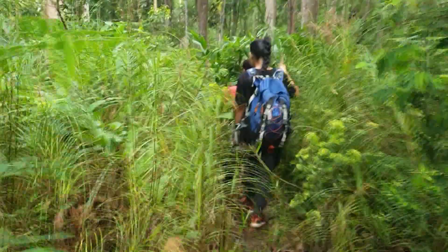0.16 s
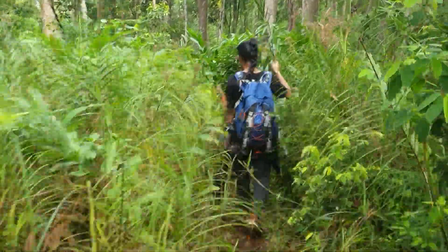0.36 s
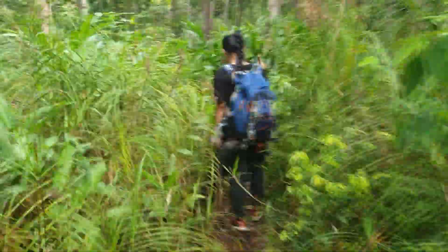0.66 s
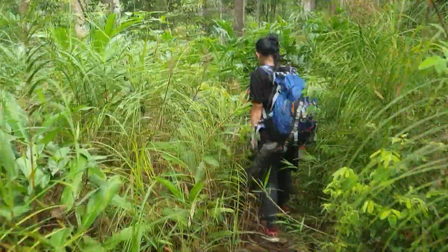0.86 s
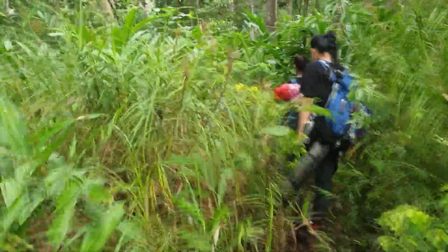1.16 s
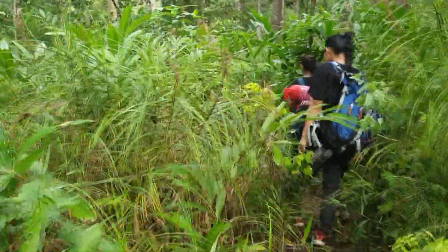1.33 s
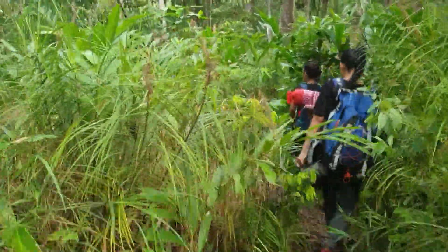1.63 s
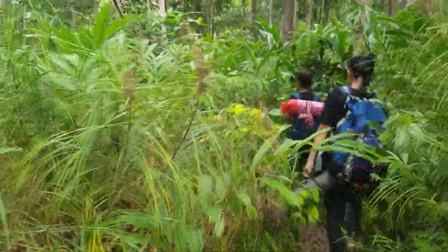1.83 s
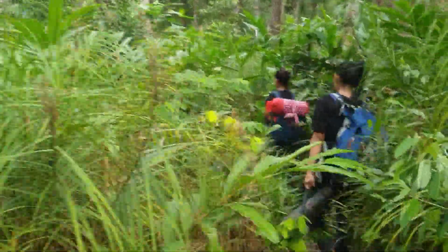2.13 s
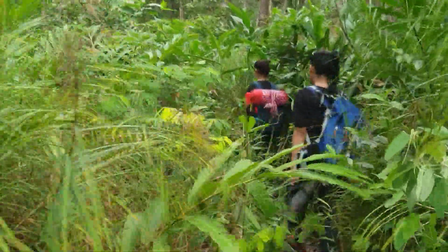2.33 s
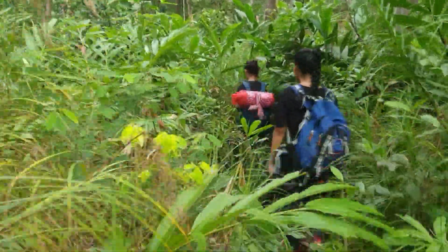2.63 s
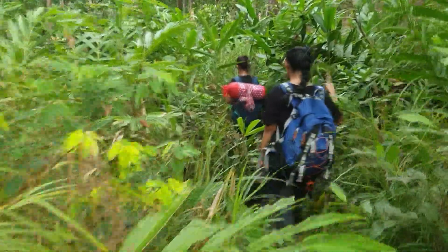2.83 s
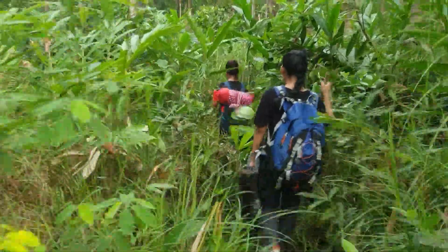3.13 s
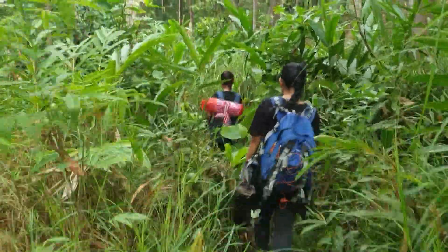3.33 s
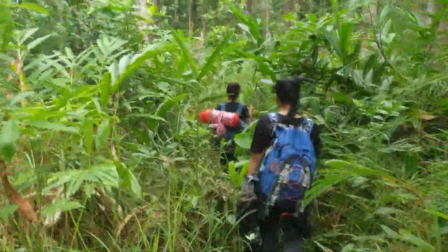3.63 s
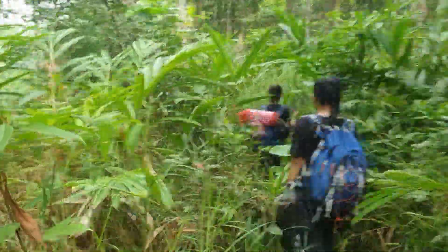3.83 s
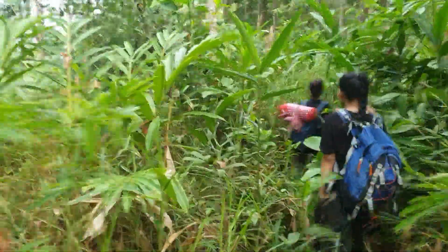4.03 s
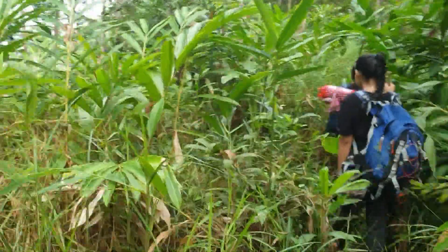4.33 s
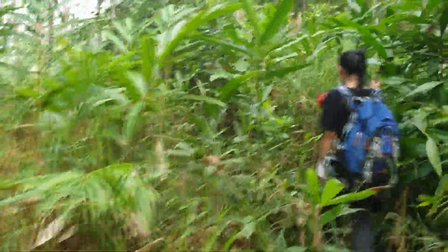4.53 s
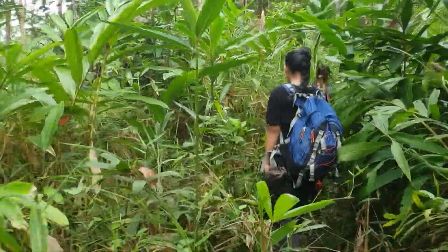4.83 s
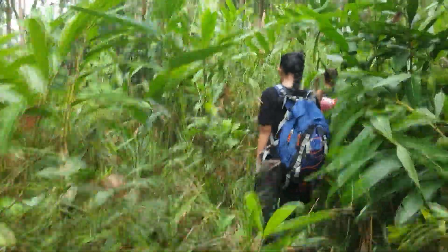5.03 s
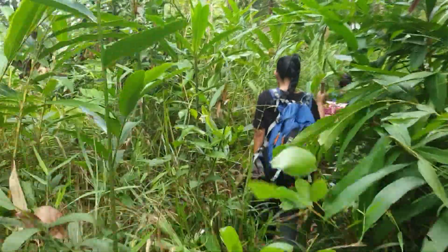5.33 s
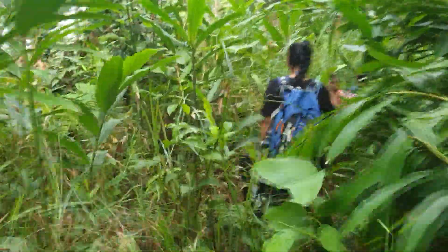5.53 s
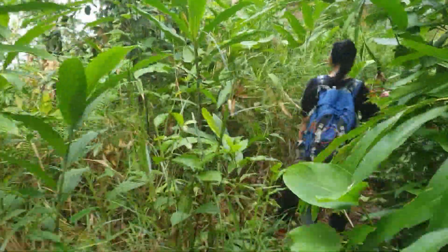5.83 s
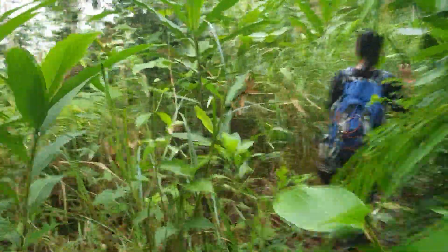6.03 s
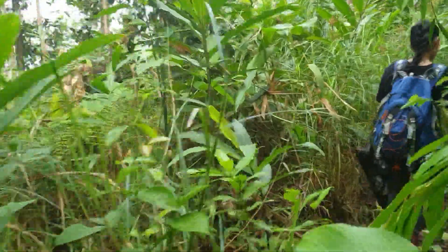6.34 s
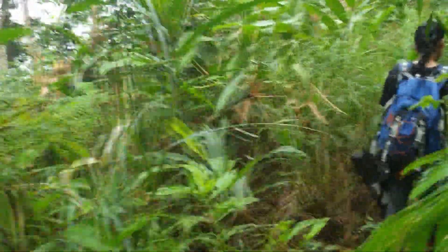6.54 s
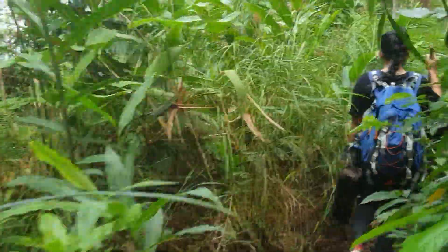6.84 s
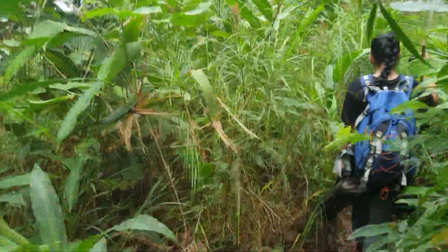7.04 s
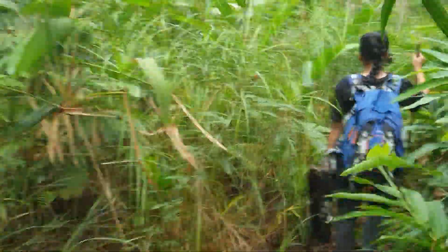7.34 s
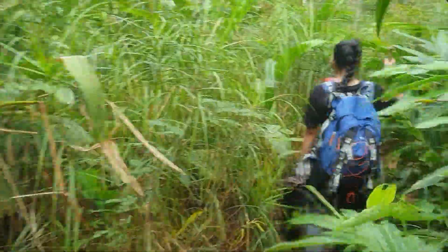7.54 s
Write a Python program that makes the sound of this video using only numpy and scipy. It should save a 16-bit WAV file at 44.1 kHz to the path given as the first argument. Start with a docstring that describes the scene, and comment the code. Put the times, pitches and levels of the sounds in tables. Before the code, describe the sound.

Walkers push through dense undergrowth with rustling leaves, sharp twig cracks and soft footfalls over a high, constant cicada chorus.

```python
"""Legs swish through tall grass and stems snap on an overgrown forest trail, over a cicada chorus.
One small microphone is carried behind the walkers. Leaves, litter and grass are grainy noise under stride and
sweep envelopes; snaps, soft footfalls and grass flicks are dying bursts of resonant noise. The cicadas are
ringing clicks in one shrill band near 5 kHz over a wide hiss; their level drops abruptly after the last
loud snaps, as if a recorder's gain control turned them down."""
import sys
import numpy as np
from scipy import signal
from scipy.io import wavfile
from scipy.ndimage import uniform_filter1d

SR = 44100
rng = np.random.default_rng(int(sys.argv[2]) if len(sys.argv) > 2 else 0)


def wav_record(signal):
    """Record a signal, one row per channel, as 16-bit PCM in the file named by sys.argv[1]."""
    frames = np.transpose(np.atleast_2d(signal))
    bounded = np.clip(frames, -1, 1)
    # unit amplitude maps onto the largest positive 16-bit level
    quanta = np.round(bounded * 32767).astype(np.int16)
    wavfile.write(sys.argv[1], SR, quanta)


N = 338688  # samples

# Fine grass swishing round the legs. Each row: frequency in Hz, relative density in dB per Hz.
SWISH_SPECTRUM = [(7000, -45), (8800, -15.5), (10000, -1.5), (12000, 0.5), (13200, -4), (14200, -10),
                  (16000, -20)]
# Airy grass tops close to the microphone. Each row: frequency in Hz, relative density in dB per Hz.
AIR_SPECTRUM = [(12000, -25), (13300, -4), (14200, 0), (16000, -2)]
REST_SWISH_DB, REST_AIR_DB = -47.3, -54.1  # grass between sweeps


def fine_grass():
    """Thin blades scrape past the legs, and grass tops brush by close to the microphone."""
    blades = friction(SWISH_SPECTRUM, per_s=1500, spread_db=3.3, grainy=0.078, patchy_db=1.2, damping=0.15)
    tops = friction(AIR_SPECTRUM, per_s=1500, spread_db=3.0, grainy=0.1, patchy_db=1.5, damping=0.15)
    return sweep_gain(0, REST_SWISH_DB) * blades + sweep_gain(1, REST_AIR_DB) * tops


# Legs sweeping through the grass. Each row: start in seconds, length in seconds, swish level in dB,
# level in dB of the airy grass tops close to the microphone.
SWEEPS = [(-.05, .22, -40, -46.5), (.08, .26, -38.5, -46.5), (.23, .49, -42, -54), (.63, .61, -40.5, -48),
          (1.2, .65, -45.5, -63), (1.67, .76, -44, -51.5), (2.25, .99, -46, -59), (3.08, .65, -41, -48.5),
          (3.56, .72, -43, -52), (4.3, .44, -41, -58.5), (4.88, .47, -44.5, -53.5), (5.35, .08, -39, -50.5),
          (5.35, .49, -48, -63), (6.03, .42, -39, -45), (6.36, .15, -42.5, -48.5), (6.39, .59, -46, -52),
          (6.83, .4, -43, -47), (7.0, .46, -42, -46.5), (7.58, .18, -47, -52)]
SWEEP_EDGE_S = 0.16  # longest fade in or out


def sweep_gain(layer, rest_db):
    """Gain of one grass layer: each sweep fades in, holds and fades out over the resting level."""
    t = np.arange(N) / SR
    power = gain_of(rest_db) ** 2
    for start, length, *levels_db in SWEEPS:
        edge = min(SWEEP_EDGE_S, length / 2)
        distance_to_end = np.minimum(t - start, start + length - t)
        fade = np.clip(distance_to_end / edge, 0, 1)
        power = power + (gain_of(levels_db[layer]) * fade) ** 2
    return np.sqrt(power)


# Broad leaves brushed aside. Each row: frequency in Hz, relative density in dB per Hz.
RUSTLE_SPECTRUM = [(700, -13.5), (1100, -20.5), (1500, -7), (2200, -3.5), (2800, -0.5), (3500, -7.5),
                   (5500, -5), (9000, -18), (14000, -36)]


def broad_leaves():
    """Leaves scrape in many small slips, louder with the strides."""
    rustle = friction(RUSTLE_SPECTRUM, per_s=900, spread_db=2.55, grainy=0.17, patchy_db=1.95, damping=0.18)
    return stride_gain(1) * rustle


# Litter underfoot. Each row: frequency in Hz, relative density in dB per Hz.
TREAD_SPECTRUM = [(60, -7), (110, -0.5), (160, -2), (300, -1.5), (600, -2), (1100, -2), (1400, -3),
                  (2200, -46.5)]


def litter(tread_gain):
    """Trodden litter grinds in low, dull scrapes."""
    return tread_gain * friction(TREAD_SPECTRUM, per_s=400, spread_db=2.2, grainy=0.1, patchy_db=1.94,
                                 damping=0.22, size=1024)


# Steady wading between strides. Each row: time in seconds, litter underfoot in dB, broad leaves in dB.
WADING = [(0.0, -60.0, -43.0), (0.43, -61.0, -50.5), (0.57, -55.5, -44.5), (0.83, -61.5, -46.0),
          (1.13, -58.5, -45.0), (1.31, -64.0, -49.5), (1.65, -66.5, -46.5), (1.79, -57.5, -44.0),
          (2.89, -60.0, -45.5), (3.2, -63.5, -43.5), (3.32, -58.5, -44.5), (3.96, -59.5, -47.5),
          (4.38, -58.5, -44.5), (4.93, -58.5, -46.5), (5.64, -61.0, -45.0), (5.94, -66.0, -47.0),
          (6.13, -59.0, -43.0), (6.82, -52.0, -41.0), (7.05, -44.5, -34.5), (7.29, -51.0, -37.5),
          (7.68, -54.0, -47.0)]
# Strides that scuff the litter and brush leaves aside. Each row: loudest moment in seconds,
# length in seconds, litter level in dB, leaf level in dB.
STRIDES = [(.2, .35, -53, -37.5), (.5, .31, -55.5, -39), (.93, .18, -55, -40), (1.37, .12, -50, -45.5),
           (1.53, .29, -57, -53.5), (2.33, .22, -54, -49.5), (2.62, .14, -53.5, -52.5),
           (3.02, .29, -59, -52.5), (3.25, .14, -51, -42), (3.74, .31, -66, -43), (4.17, .45, -52.5, -43.5),
           (4.68, .4, -54.5, -46.5), (5.17, .52, -51, -46.5), (5.39, .18, -50.5, -38),
           (5.51, .14, -54, -40.5), (6.43, .18, -58, -41), (7.22, .19, -37, -33), (7.65, .08, -45, -39.5)]
RISE = 0.49  # share of a stride spent swelling


def stride_gain(layer):
    """Gain of litter (0) or leaves (1): steady wading plus a swell and fall for every stride."""
    t = np.arange(N) / SR
    power = level(WADING, 1 + layer) ** 2
    for peak, length, *levels_db in STRIDES:
        start, end = peak - RISE * length, peak + (1 - RISE) * length
        arch = np.interp(t, [start, peak, end], [0, 1, 0])
        power = power + (gain_of(levels_db[layer]) * arch ** 2) ** 2
    return np.sqrt(power)


# Stems snapping and leaves flicking back. Each row: start in seconds, peak of the ring in dB,
# ring frequency in Hz, resonance width in Hz.
SNAPS = [(.041, -22, 2600, 1800), (.143, -25, 4200, 2500), (.146, -22, 2200, 1800),
         (1.081, -26, 2600, 2200), (1.188, -25, 2410, 2000), (1.433, -28, 1340, 700),
         (2.197, -26, 2210, 1600), (2.239, -31, 2160, 900), (2.537, -33, 1500, 900),
         (3.32, -27, 2700, 1500), (3.5, -28, 2300, 2000), (3.712, -24, 2250, 600), (5.089, -30, 2810, 800),
         (5.192, -20.5, 2570, 600), (5.221, -18, 2500, 1500), (5.228, -23, 2500, 1200),
         (5.361, -28, 2400, 1300), (6.405, -29, 1900, 1200), (6.555, -25, 1900, 1600),
         (6.584, -23, 2000, 1100), (6.675, -12.5, 2080, 2000), (6.79, -26, 2230, 1100),
         (7.101, -28, 2500, 900), (7.13, -25, 1600, 900), (7.188, -18, 4800, 3000), (7.194, -18, 900, 1190),
         (7.198, -16, 2600, 1200), (7.202, -12, 2500, 4000), (7.641, -26, 2300, 1500)]
SNAP_T60_S, T60_S_PER_DB, FAINT_DB = 0.022, 0.0014, -30  # above FAINT_DB a snap crackles on for longer
BREAK = 10  # first crack against its splinters, amplitude ratio before filtering
SPLINTER_DB = -12  # bright splinters against the ring


def snaps():
    """A break and its splinters ring the stem, with a short bright crackle on top."""
    out, t = np.zeros(N), burst_time()
    for start, db, hz, width in SNAPS:
        t60 = SNAP_T60_S + T60_S_PER_DB * max(db - FAINT_DB, 0)
        crack = rng.standard_normal(len(t)) + BREAK * (t == 0)  # the break itself, then splinters
        ring = burst(t, t60, hz, width, resonate(crack, hz, 2 * width))
        splinters = burst(t, 0.018, 3900, 3500, crack)
        add(out, start, gain_of(db) * ring)
        add(out, start, gain_of(db + SPLINTER_DB) * splinters)
    return out


# Feet on soft earth and roots. Each row: start in seconds, peak in dB, thud frequency in Hz,
# time in seconds for the driving noise to die by 60 dB.
STEPS = [(0.143, -48, 188, 0.11), (0.213, -50, 72.7, 0.08), (0.912, -40.5, 525, 0.08),
         (1.341, -44.5, 675, 0.12), (1.504, -41.5, 732, 0.039), (2.133, -44, 806, 0.1),
         (2.32, -43, 355, 0.2), (2.716, -54, 80.7, 0.091), (4.314, -39, 886, 0.05), (5.372, -43, 170, 0.08),
         (5.512, -44, 770, 0.08), (5.813, -45.5, 179, 0.048), (5.914, -46, 1100, 0.052),
         (5.981, -42.5, 1040, 0.07), (6.044, -44, 458, 0.052), (6.424, -43.5, 153, 0.051),
         (6.672, -37, 1030, 0.037), (7.019, -35.5, 470, 0.055), (7.184, -28, 167, 0.07),
         (7.464, -42, 161, 0.038)]


def footfalls():
    """A foot presses in over a few milliseconds and drives a broad, quickly dying thud."""
    out, t = np.zeros(N), burst_time()
    for start, db, hz, t60 in STEPS:
        push = resonate(rng.standard_normal(len(t)), hz, 4 * hz) * (1 - np.exp(-t / 0.006))
        add(out, start, gain_of(db) * burst(t, t60, hz, 0.8 * hz, push))
    return out


# Grass tips flicking against cloth. Each row: start in seconds, peak in dB.
TICKS = [(.146, -31), (.218, -29), (.782, -31), (1.084, -32), (5.374, -28), (5.762, -31), (6.31, -31),
         (6.467, -28), (6.657, -29), (7.006, -30), (7.353, -27)]


def grass_flicks():
    """Each tip gives a soft-edged burst of noise high in the treble."""
    out, t = np.zeros(N), burst_time()
    for start, db in TICKS:
        flick = rng.standard_normal(len(t)) * (1 - np.exp(-t / 0.0042))
        add(out, start, gain_of(db) * burst(t, 0.08, 12700, 6300, resonate(flick, 11400, 9700)))
    return out


# Rumble of the carried microphone. Each row: frequency in Hz, relative density in dB per Hz.
RUMBLE_SPECTRUM = [(22, -22), (45, -6), (62, 8.5), (95, -6), (150, -21)]
JOLT_DB, JOLT_S, SWAY_DB = -12, 0.15, -73  # jolt against the tread, its smoothing time, steady sway


def microphone_shake(tread_gain):
    """The carried microphone jolts sluggishly with the tread over a steady sway, heard as low rumble."""
    jolt = gain_of(JOLT_DB) * uniform_filter1d(tread_gain, round(JOLT_S * SR))
    rumble = coloured(rng.standard_normal(N), RUMBLE_SPECTRUM, 0.84, size=4096)
    return np.hypot(jolt, gain_of(SWAY_DB)) * rumble


# The insects as picked up, with the abrupt drop after the last loud snaps.
# Each row: time in seconds, near shrill singers in dB, distant wide chorus in dB.
INSECTS = [(0.0, -40.5, -38.5), (0.34, -37, -39.5), (0.77, -39.5, -39), (1.18, -38, -39),
           (1.69, -38, -39.5), (2.03, -38, -38), (2.35, -39.5, -38.5), (3.38, -40.5, -38.5),
           (3.78, -37.5, -37.5), (4.49, -37.5, -37.5), (4.85, -40, -38.5), (5.62, -38.5, -39),
           (5.82, -38, -40), (7.23, -39.5, -40.5), (7.38, -44, -44.5), (7.68, -42.5, -44)]
# Distant chorus. Each row: frequency in Hz, relative density in dB per Hz.
CHORUS_SPECTRUM = [(2400, -25), (3300, -5.5), (4200, -1), (5500, 0.5), (6400, -0.5), (7100, -8),
                   (8600, -15.5), (11000, -14.5), (13500, -45)]
# Near singers' tymbal resonances. Each row: frequency in Hz, width in Hz, level in dB among the singers.
SINGERS = [(4858, 98, 5), (4914, 104, 9), (5011, 108, 9.5)]


def cicadas():
    """Near singers share one shrill band; far singers blur to a wide hiss."""
    near = evened(sum(singer(*row) for row in SINGERS))
    far = coloured(rng.standard_normal(N), CHORUS_SPECTRUM, 1.16)
    return level(INSECTS, 1) * near + level(INSECTS, 2) * far


def singer(hz, width, db):
    """Tymbal clicks ring one body twice over; the song swells and sinks a few times a second."""
    swell = evened(signal.resample(rng.standard_normal(60), N))
    clicks = grains(900, 1.2)
    song = evened(resonate(resonate(clicks, hz, width), hz, width))
    return gain_of(db + 0.95 * swell) * song


def friction(spectrum, per_s, spread_db, grainy, patchy_db, damping, size=512):
    """Many small scrapes: grains that ring briefly at scattered pitches, over a blur of unresolved ones."""
    clicks = grains(per_s, spread_db)
    pitches = np.geomspace(spectrum[1][0], min(spectrum[-2][0], 14000), num=12)
    which = rng.integers(0, len(pitches), N)  # the pitch each grain would ring at
    rings = sum(resonate(clicks * (which == k), hz, damping * hz) for k, hz in enumerate(pitches))
    blur = rng.standard_normal(N)
    drive = np.sqrt(grainy) * evened(rings) + np.sqrt(1 - grainy) * blur  # grainy is a share of power
    return coloured(drive, spectrum, patchy_db, size)


def grains(per_s, spread_db):
    """Sparse clicks of random sign; a few are large."""
    chance, size, sign = rng.random((3, N))
    heights = gain_of(-spread_db * np.log(size + 0.012))
    return evened((chance < per_s / SR) * heights * np.sign(sign - 0.5))


def coloured(x, spectrum, patchy_db, size=512):
    """Gives x a spectrum with broad drifting patches and narrow, short-lived streaks, at rms 1."""
    overlap = size * 3 // 4
    hz, _, z = signal.stft(x, SR, nperseg=size, noverlap=overlap)
    patches = smoothed_noise(z.shape, bins=8, frames=24)
    streaks = smoothed_noise(z.shape, bins=2, frames=16)
    f, db = np.transpose(spectrum)
    shape_db = np.interp(np.log(hz + 1), np.log(f), db, left=-80)
    z = z * gain_of(shape_db[:, None] + patchy_db * patches + 1.66 * streaks)
    return evened(signal.istft(z, SR, nperseg=size, noverlap=overlap)[1][:N])


def smoothed_noise(shape, bins, frames):
    """Random unevenness over frequency and time, at rms 1."""
    over_frequency = uniform_filter1d(rng.standard_normal(shape), size=bins, axis=0)
    return evened(uniform_filter1d(over_frequency, size=frames, axis=1))


def burst_time():
    """Times in seconds along one short burst."""
    return np.arange(4096) / SR


def burst(t, t60, hz, width, noise):
    """Dying noise through one resonance, peak 1."""
    ring = resonate(noise * gain_of(-60 * t / t60), hz, width)
    return ring / abs(ring).max()


def resonate(x, hz, width):
    """A two-pole resonance of gain 1 at its peak."""
    return signal.lfilter(*signal.iirpeak(hz, hz / width, SR), x)


def add(mix, start, sound):
    """Mixes a sound in at a time in seconds."""
    part = mix[round(start * SR):][:len(sound)]
    part += sound[:len(part)]


def level(rows, column):
    """One dB column of a curve table as a gain for every sample."""
    columns = np.transpose(rows)
    return gain_of(np.interp(np.arange(N) / SR, columns[0], columns[column]))


def gain_of(db):
    """Decibels to gain."""
    return 10 ** (np.asarray(db) / 20)


def evened(x):
    """Scales to rms 1."""
    return x / np.sqrt(np.mean(x ** 2) + 1e-20)


def scene():
    """Walkers in front of the microphone, cicadas around; one microphone feeds both channels."""
    tread_gain = stride_gain(0)
    brushing = fine_grass() + broad_leaves() + litter(tread_gain)
    knocks = snaps() + footfalls() + grass_flicks()
    mono = brushing + knocks + microphone_shake(tread_gain) + cicadas()
    return np.tile(mono, (2, 1))


EDGE_HZ = 15715  # top of the band


def record(dry):
    """A steep low-pass closes the band at its top edge."""
    lowpass = signal.firwin(1023, EDGE_HZ, window=("kaiser", 12), fs=SR)
    return signal.oaconvolve(dry, lowpass[None], "same")


dry = scene()
out = record(dry)
wav_record(out)
```